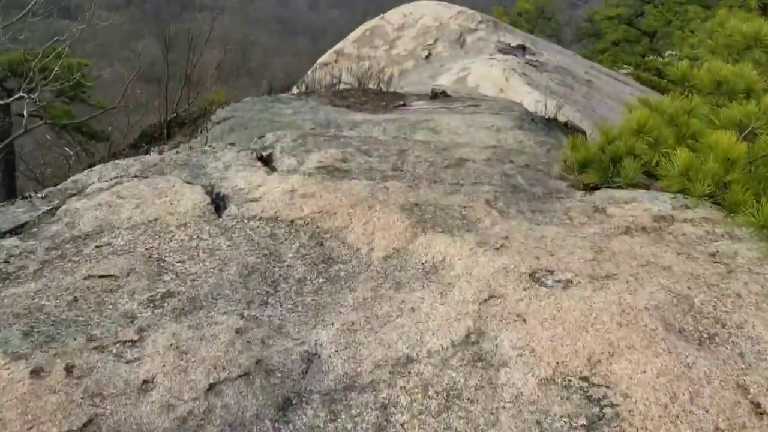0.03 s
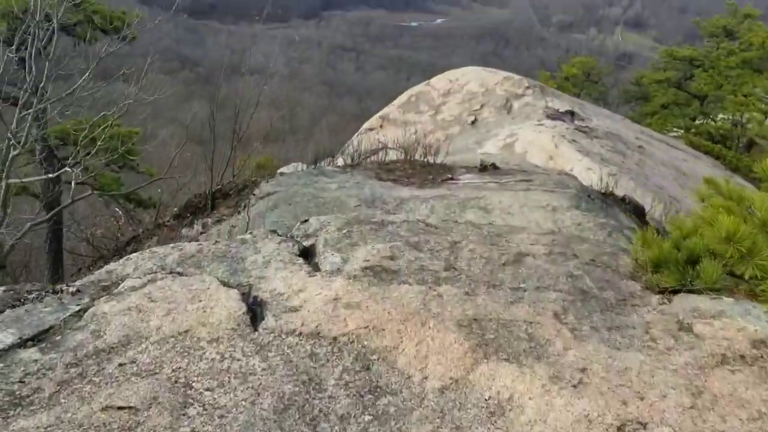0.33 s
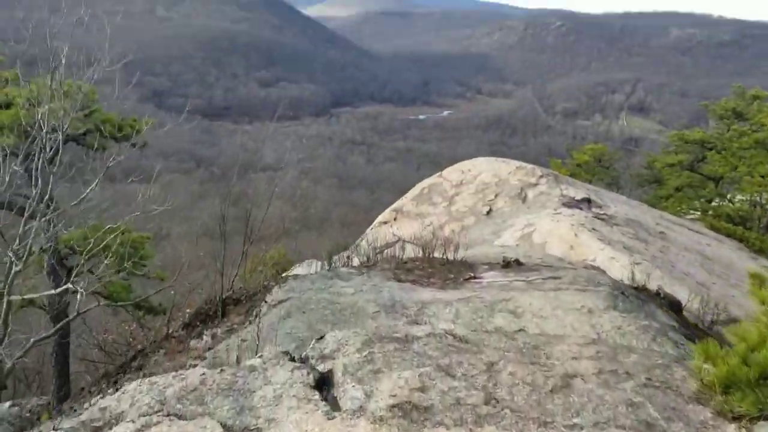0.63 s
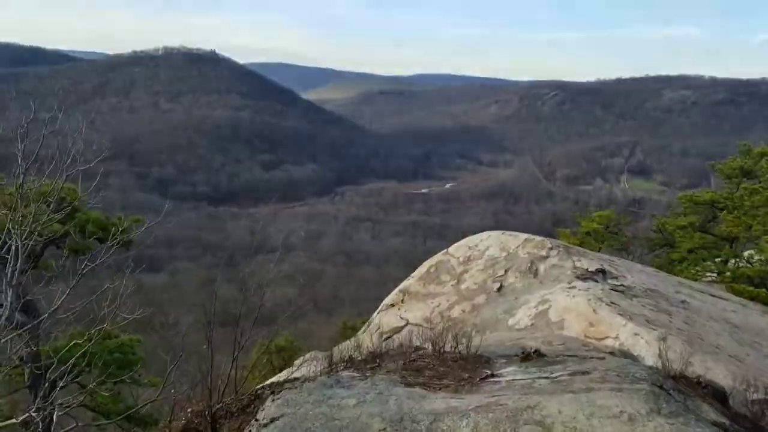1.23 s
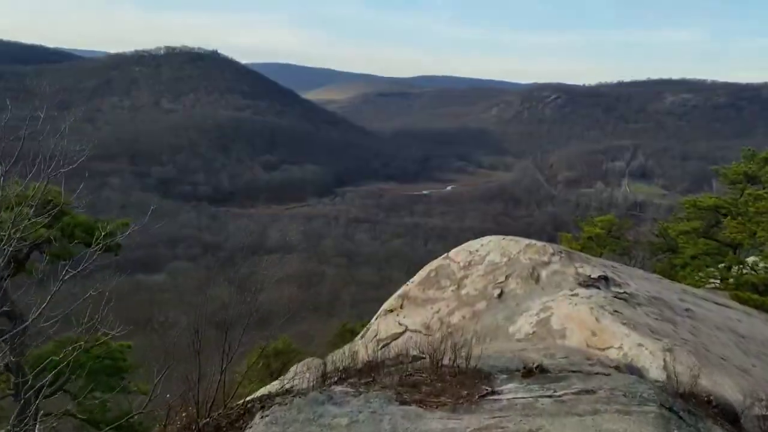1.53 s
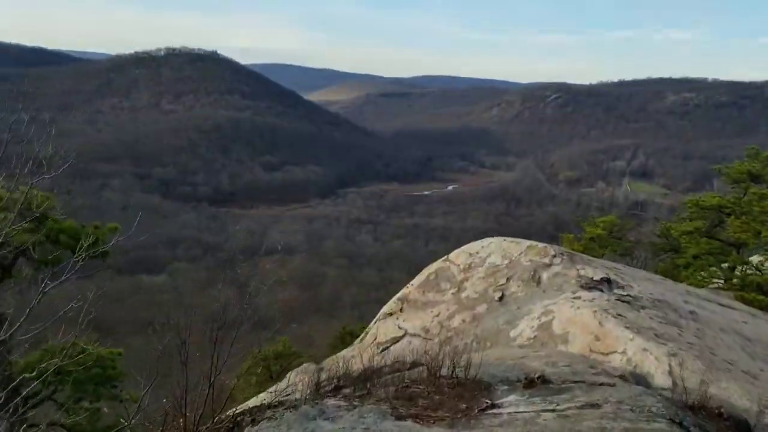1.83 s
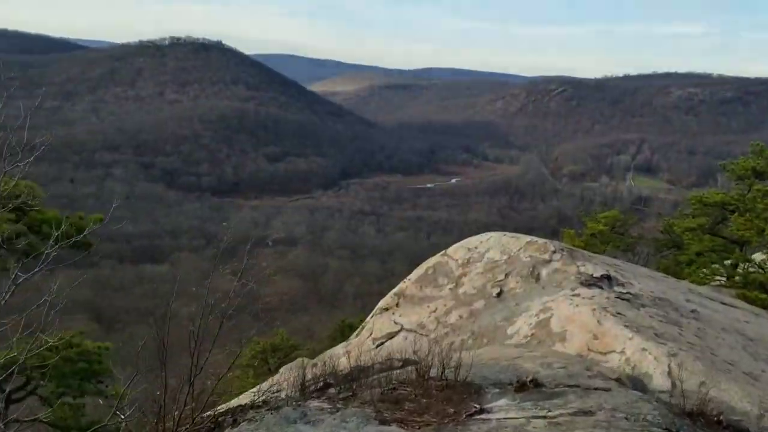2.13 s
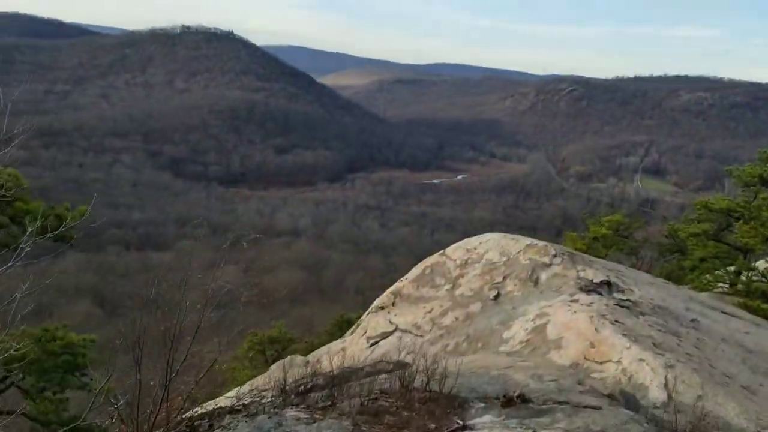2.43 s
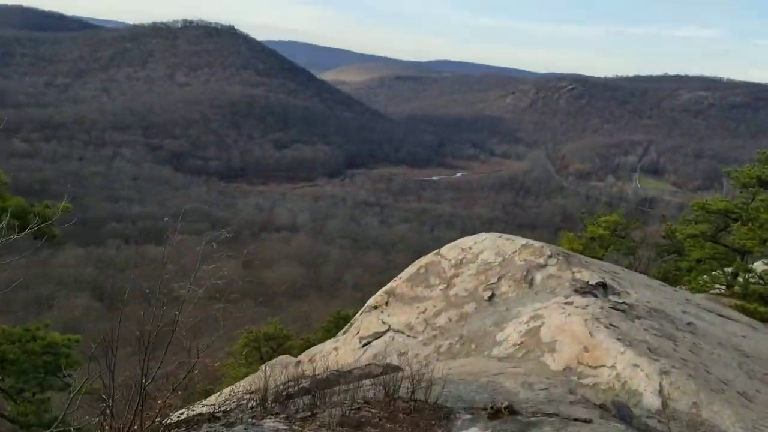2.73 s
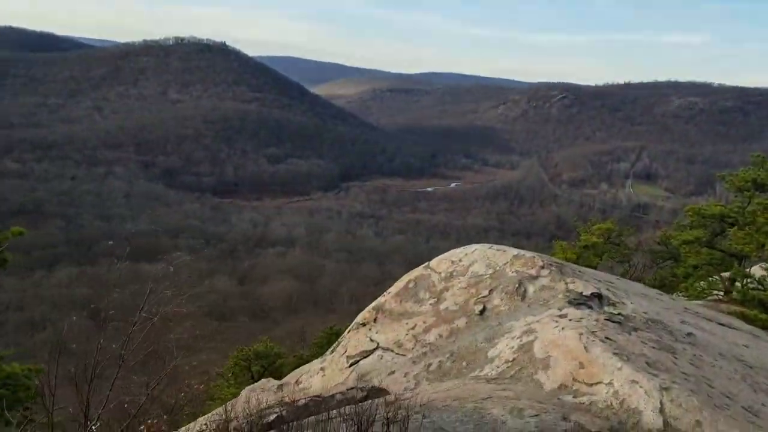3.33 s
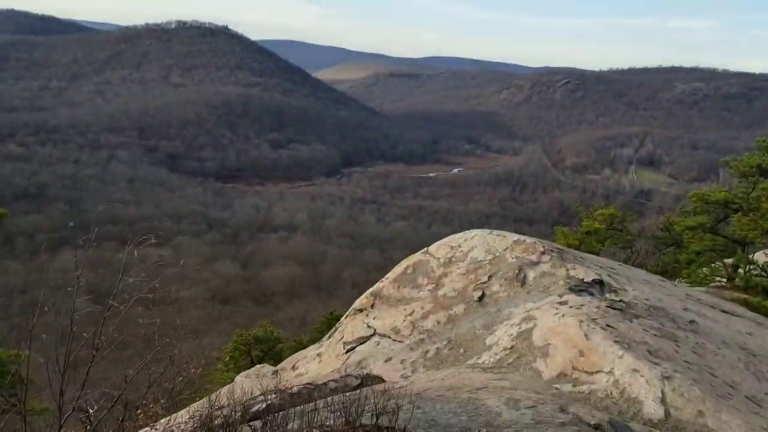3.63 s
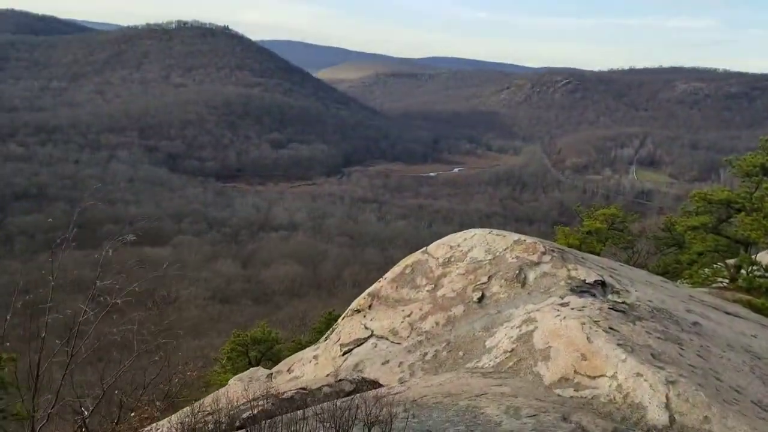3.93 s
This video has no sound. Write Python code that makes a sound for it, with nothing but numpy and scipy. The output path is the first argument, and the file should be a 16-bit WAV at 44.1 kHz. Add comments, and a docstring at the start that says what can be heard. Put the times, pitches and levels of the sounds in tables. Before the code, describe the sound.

A few light footsteps scuff and pat on bare rock outdoors, with rustling clothes and clinking loose stones. Something hard clacks once early on, then gusts buffet the hand-held microphone, strongest near the end, over a faint hiss.

```python
"""A bare rock summit, with no walls to echo. Someone shifts a few steps: clothing rustles, soles
scuff and pat, grit ticks, loose stones clink, and something hard clacks once on the stone.
Gusts buffet the two ports of a hand-held microphone in turn, over a faint hiss of open air.
Wind and scuffs are shaped noise, contacts are short noise bursts and pressure pulses,
and whatever rings is a set of quickly dying sine modes."""
import sys
import numpy as np
from scipy import signal
from scipy.fft import rfft, irfft
from scipy.io import wavfile
from scipy.ndimage import uniform_filter1d

SR = 44100
rng = np.random.default_rng(int(sys.argv[2]) if len(sys.argv) > 2 else 0)


def materialize(psi):
    """Save the field psi as 16-bit PCM at rate SR to the path in sys.argv[1].

    A 1-D psi becomes a single channel; in a 2-D psi each row is a channel.
    """
    bounded = np.clip(np.atleast_2d(psi).T, -1, 1)
    quanta = np.round(bounded * 32767).astype(np.int16)
    wavfile.write(sys.argv[1], SR, quanta)


N = 176400
T = np.arange(N) / SR
HIT_SAMPLES = 8192
HIT_T = T[:HIT_SAMPLES]


def undb(db):
    """Decibels to gain."""
    return 10 ** (np.asarray(db) / 20)


def unit(x):
    """Scale to rms 1."""
    return x / np.sqrt(np.mean(x ** 2, axis=-1, keepdims=True))


def curve(rows):
    """Join (seconds, value) rows by straight lines."""
    return np.interp(T, *np.array(rows).T)


def pan(db):
    """Left and right gains, db apart; positive leans left."""
    return undb(np.array([[db], [-db]]) / 2)


def shape(colour, size, tilt=0):
    """Gain per frequency bin for a colour, tilted in dB per octave."""
    hz, db = np.array(colour, float).T
    octave = np.log2(np.maximum(np.fft.rfftfreq(size, 1 / SR), 1))
    tilt_db = tilt * np.log2(np.clip(2 ** octave, hz[0], hz[-1]))
    return undb(np.interp(octave, np.log2(hz), db) + tilt_db)


def noise(colour, tilt=0):
    """Coloured noise, unrelated left and right."""
    white = rng.standard_normal((2, N))
    return unit(irfft(rfft(white) * shape(colour, N, tilt), N))


def wander(hz):
    """Smooth random drift, spread near 1."""
    hold = int(SR / hz)
    return 1.26 * uniform_filter1d(rng.standard_normal(N)[np.arange(N) // hold], hold)


def pulse(centre_s, hz, t=HIT_T, width_cycles=.5):
    """A brief swing of pressure: a cosine under a bell curve."""
    cycles = (t - centre_s) * hz
    return np.cos(2 * np.pi * cycles) * np.exp(-(cycles / width_cycles) ** 2)


def burst(colour, decay_s, tilt=0, grain_db=0, taps=512, grain_samples=32, unrelated=.3):
    """A dying spray of tiny contacts; the unrelated share of its power differs between the ports."""
    cepstrum = irfft(np.log(shape(colour, taps, tilt)))[:taps // 2]
    cepstrum[1:] *= 2  # minimum phase keeps the attack sharp
    response = irfft(np.exp(rfft(cepstrum, taps)))
    white = rng.standard_normal((3, HIT_SAMPLES))
    stereo = np.sqrt(1 - unrelated) * white[0] + np.sqrt(unrelated) * white[1:]
    grains = undb(grain_db * np.repeat(rng.standard_normal(HIT_SAMPLES // grain_samples), grain_samples))
    fade = np.exp(-HIT_T / decay_s)
    spray = signal.fftconvolve(stereo * fade * grains, response[None], axes=1)[:, :HIT_SAMPLES]
    return unit(spray) * np.sqrt(np.mean(fade ** 2))


def ring(modes, focus=0, pitch=1, focus_hz=2270):
    """Dying modes of a struck object, turned down by focus dB per octave away from focus_hz."""
    hz, db, t60 = np.array(modes).T[:, :, None]
    gains = undb(db - focus * np.abs(np.log2(hz / focus_hz)))
    phase = .5 * rng.standard_normal((2, len(hz), 1))  # a little different at each port
    fade = np.exp(-np.log(1000) * HIT_T / t60)
    return (gains * np.sin(2 * np.pi * pitch * hz * HIT_T + phase) * fade).sum(1)


def add(out, start_s, sound, lag_s=.00045):
    """Mix in a sound from the ground; it reaches the left port lag_s late."""
    for port, lag in enumerate((lag_s, 0)):
        first = int((start_s + lag) * SR)
        part = sound[port, :N - first]
        out[port, first:first + len(part)] += part


# Gust strength at each microphone port. Each row: time in seconds, level in dB.
GUSTS_LEFT = [(0.0, -63), (0.249, -60.5), (0.788, -64.5), (1.177, -52.5), (1.267, -35.5), (1.427, -45),
              (1.816, -54), (1.846, -38), (2.175, -58.5), (2.355, -37), (2.424, -52), (2.734, -58),
              (2.844, -37), (2.923, -51), (3.103, -40.5), (3.143, -18.5), (3.193, -28), (3.223, -20),
              (3.263, -23.5), (3.332, -19), (3.592, -38), (3.662, -40), (3.702, -46), (3.991, -57)]
GUSTS_RIGHT = [(0.0, -64), (0.22, -61.5), (0.619, -66), (0.928, -56), (1.177, -59), (1.277, -37),
               (1.646, -46), (1.676, -30), (1.726, -39.5), (1.756, -28.5), (1.786, -45.5), (1.856, -29.5),
               (1.876, -43.5), (1.976, -39), (2.005, -29.5), (2.095, -25.5), (2.125, -48), (2.504, -39.5),
               (2.584, -55.5), (2.704, -45), (2.804, -55.5), (3.043, -47.5), (3.063, -36.5), (3.133, -55.5),
               (3.263, -43), (3.582, -50), (3.801, -47), (3.991, -64.5)]
# Deep rumble, boomy buffeting and brighter eddies. Each row: frequency in Hz, relative level in dB.
RUMBLE_COLOUR = [(15, -31), (40, 3), (70, 4), (110, -1), (200, -23.5), (600, -80)]
BUFFET_COLOUR = [(20, -24.5), (45, -15.5), (80, 0.5), (120, 3.5), (180, -5.5), (260, -13), (400, -33.5),
                 (700, -39), (2000, -94)]
EDDY_COLOUR = [(60, -23), (180, 1), (300, 7), (600, -13), (900, -26.5), (1600, -36.5), (5000, -51.5)]


def wind(rumble_ceiling_db=-37, strong_gust_db=-17, eddy_growth=1.9, even_s=.0329):
    """Each port rumbles with its own gusts; strong ones shed brighter eddies."""
    def even(x):
        """Flatten the noise's own swells, so the gusts set its level."""
        return x / np.sqrt(uniform_filter1d(x ** 2, int(even_s * SR), axis=1) + 1e-9)

    gust_db = np.array([curve(GUSTS_LEFT), curve(GUSTS_RIGHT)])
    rumble = noise(RUMBLE_COLOUR) * undb(np.minimum(gust_db, rumble_ceiling_db))
    buffet = even(noise(BUFFET_COLOUR)) * undb(gust_db + 1)
    eddies = even(noise(EDDY_COLOUR)) * undb(-23.5 + eddy_growth * (gust_db - strong_gust_db))
    return rumble + buffet + eddies


# Tone of the airy bed, hiss and breeze. Each row: frequency in Hz, relative level in dB.
HISS_COLOUR = [(30, -7), (100, -39), (200, 1.5), (260, 5), (380, -8.5), (650, -8), (1000, -17), (1600, -24),
               (3000, -26), (5500, -24.5), (8500, -22.5), (12000, -25), (15500, -32.5)]
BREEZE_COLOUR = [(150, -3), (300, -3.5), (650, -4), (1100, -10.5), (2000, -24), (4000, -31), (9000, -27.5),
                 (15000, -36)]
# Their fader rides. Each row: time in seconds, level in dB.
HISS_LEVEL = [(0, -55.5), (.3, -59), (.65, -56), (.85, -58.5), (1.05, -56.5), (1.2, -62.5), (1.8, -56.5),
              (2.5, -59.5), (3.08, -60.5), (3.72, -58.5), (3.86, -55), (4, -59.5)]
BREEZE_LEVEL = [(0, -76), (.7, -67.5), (.95, -60.5), (1.3, -58), (1.8, -59), (2.25, -57.5), (2.6, -57),
                (2.85, -56.5), (3.1, -60.5), (3.7, -60.5), (4, -69)]


def open_air():
    """A faint wavering hiss, and a breeze that picks up over the summit."""
    hiss = noise(HISS_COLOUR) * undb(curve(HISS_LEVEL) + .4 * wander(hz=7.04)) * pan(1.5)
    breeze = noise(BREEZE_COLOUR) * undb(curve(BREEZE_LEVEL) + .62 * wander(hz=38.7)) * pan(6.5)
    return hiss + breeze


# Low thumps on the microphone. Each row: time in seconds, peak level in dB, pitch in Hz, pan in dB.
THUMPS = [(0.149, -45, 91, -6), (0.837, -46, 58.3, -8), (1.278, -26, 104, 10), (1.346, -26, 129, -8.5),
          (1.669, -30.5, 166, -21.5), (1.761, -31.5, 146, -18), (2.007, -31.5, 181, -25.5),
          (2.017, -27, 204, -23.5), (2.032, -36, 188, -3), (2.075, -24, 222, -24.5), (2.085, -29, 194, -30),
          (3.154, -27, 345, 27.5), (3.226, -26.5, 157, 32.5), (3.239, -38.5, 475, 22), (3.264, -34, 726, 7),
          (3.311, -31, 398, 28), (3.329, -31.5, 580, 27), (3.364, -30, 390, 27), (3.392, -37.5, 397, 18),
          (3.557, -33, 192, 26)]


def microphone_thumps():
    """Wind and handling thump the microphone; the strongest gust flutters briefly on the left."""
    thumps = sum(undb(db) * pan(pan_db) * pulse(at, hz, T) for at, db, hz, pan_db in THUMPS)
    flutter = undb(-27.5) * pan(35) * pulse(centre_s=3.331, hz=178.3, t=T, width_cycles=3.2)
    return thumps + flutter


# The sandy tone of scuffs, rustles and grit. Each row: frequency in Hz, relative level in dB.
GRAINY_COLOUR = [(300, -5.5), (1000, 1.5), (1600, 1), (2150, -0.5), (2480, -5.5), (2900, -3), (3600, -1),
                 (4900, -2.5), (6400, -7), (9000, -7), (12000, -14.5), (15500, -23.5)]
# Soft rasps and rustles of soles and clothing. Each row: peak time in seconds, level in dB,
# rise and decay in seconds, brightness in dB per octave.
RASPS = [(.17, -66.5, 0.045, 0.049, 9), (.56, -60.5, 0.08, 0.089, 1.5), (.98, -57, .03, 0.11, -1),
         (1.28, -65.5, 0.051, 0.092, 4), (1.6, -57.5, 0.042, 0.074, -1.5), (2.04, -60, 0.05, 0.18, -0.5),
         (2.27, -59.5, 0.16, 0.23, -3.5), (2.8, -62, 0.071, 0.14, -1), (3.198, -55.5, 0.025, 0.14, -1),
         (3.56, -63.5, 0.068, 0.067, 0), (3.85, -62.5, 0.083, 0.13, -1.5)]


def scuffs_and_rustles():
    """Soles and clothing rub in soft, grainy rasps that swell and fade."""
    out = np.zeros((2, N))
    grains = undb(wander(hz=1200))
    for peak, db, rise, decay, tilt in RASPS:
        swell = np.exp(-np.maximum((peak - T) / rise, (T - peak) / decay))
        out += undb(db) * swell * grains * noise(GRAINY_COLOUR, tilt)
    return out * pan(7.5)


# The muffled tone of a sole on rock. Each row: frequency in Hz, relative level in dB.
PAT_COLOUR = [(80, -8), (250, 0), (450, 0), (750, -5), (1100, -11), (1700, -17), (2500, -30), (5000, -48),
              (15000, -65)]
# Footfalls. Each row: start in seconds, level in dB, decay in seconds, pan in dB,
# brightness in dB per octave.
PATS = [(.470, -45, .004, 1, -2), (.511, -52, .003, 1, 1), (1.5325, -33.5, .0045, 1, -1),
        (2.053, -35, .003, -6, -1), (3.790, -37.5, .005, 1, -2.5)]


def pats():
    """A sole lands on the rock: a soft burst with a dull thud under it."""
    out = np.zeros((2, N))
    thud = undb(2) * pulse(centre_s=.003, hz=340)
    for start, db, decay, pan_db, tilt in PATS:
        add(out, start, undb(db) * pan(pan_db) * (burst(PAT_COLOUR, decay, tilt) + thud), lag_s=0)
    return out


# Small, dry crunches. Each row: start in seconds, level in dB, decay in seconds,
# brightness in dB per octave, pan in dB.
GRIT_TICKS = [(0.4818, -45.5, 0.0015, 4.5, 2), (0.548, -43, 0.0012, -4, -11), (0.57, -54, 0.0055, 2, -6),
              (.988, -52, 0.0066, 10, 0), (.999, -42.5, 0.0062, -5.5, -1), (1.564, -46, .002, -4, 14),
              (1.608, -43.5, 0.0055, -9.5, 7), (1.808, -52.5, 0.0026, -2.5, -2),
              (2.014, -43.5, 0.0059, -0.5, 5.5), (2.027, -43, 0.0096, -9, 7), (2.2391, -51, .003, -3.5, 17),
              (2.288, -51.5, 0.0036, 1, 0), (2.767, -51, 0.0064, -7, 15.5), (3.15, -51, .0055, -1.5, 2),
              (3.159, -49, 0.028, -2.5, 11.5), (3.182, -35.5, 0.012, -3.5, 4.5),
              (3.201, -49, 0.006, -1, -4), (3.493, -50, 0.015, -2.5, 8.5), (3.515, -52.5, 0.0082, -5, 9),
              (3.569, -51.5, 0.013, -4, 6.5), (3.59, -54.5, 0.0073, -2, 12), (3.893, -51.5, .004, -5, 10)]


def grit():
    """Grit crushed under the sole ticks in short, uneven sprays."""
    out = np.zeros((2, N))
    for start, db, decay, tilt, pan_db in GRIT_TICKS:
        add(out, start, undb(db) * pan(pan_db) * burst(GRAINY_COLOUR, decay, tilt, grain_db=4))
    return out


# A loose stone's ring. Each row: base frequency in Hz, relative level in dB, seconds to fall 60 dB.
STONE_MODES = [(2100, -7.5, 0.019), (2435, 2.5, 0.019), (2545, -9.5, 0.044), (3060, -8, .022),
               (3880, -33, 0.03), (4900, -17, .025), (6260, -11, 0.036), (8900, -35, .025)]
# Stones nudged underfoot. Each row: start in seconds, level in dB, pan in dB, pitch ratio.
CLINKS = [(0.5458, -45, 3, 0.93), (.9745, -47, 2, 0.93), (.985, -48, 2, 1.2), (.999, -42.5, 2, 0.94),
          (2.016, -48.5, 2, 0.7), (2.030, -50.5, 7, .85), (3.185, -34, 3, 1.04), (3.206, -41.5, 0, 1.1),
          (3.495, -50.5, 8, 1.02), (3.570, -47.5, 11, 1.29)]


def clinks():
    """Loose stones ring briefly against the rock, each at its own pitch."""
    out = np.zeros((2, N))
    for start, db, pan_db, pitch in CLINKS:
        add(out, start, undb(db) * pan(pan_db) * ring(STONE_MODES, pitch=pitch))
    return out


# The clack's sharp attack and crunchy tail. Each row: frequency in Hz, relative level in dB.
CRACK_COLOUR = [(100, -23), (300, -19), (700, -1), (1200, -7), (1900, -0.5), (3200, 0.5), (4300, -3),
                (6500, -2), (9500, -14.5), (12000, -31), (15500, -38)]
CRUNCH_COLOUR = [(150, -11), (750, -1), (1200, 1), (1700, -9.5), (2500, -0.5), (3500, -11.5), (6000, -13),
                 (9000, -13), (12000, -16), (15500, -22)]
# The hard object's ring. Each row: frequency in Hz, relative level in dB, seconds to fall 60 dB.
CLACK_MODES = [(690, -2, .019), (2310, -7.5, .032), (2700, -7, .036), (2850, -11, .035), (3930, 0, .021),
               (4270, -13, .018), (4900, -15, .018), (5560, -18, .018), (7010, -15, .022),
               (8850, -18, .028)]
# The blow and its rebound. Each row: start in seconds, crack level in dB, ring level in dB,
# ring focus in dB per octave.
BLOWS = [(.9189, -15, -18, 0), (.9276, -29, -23, 14)]


def clack():
    """Something hard hits the stone with a crack, a knock and a short ring; a crunch trails the blow."""
    out = np.zeros((2, N))
    knock = undb(-8) * pulse(centre_s=.00072, hz=930)
    for start, crack_db, ring_db, focus in BLOWS:
        attack = undb(crack_db) * (burst(CRACK_COLOUR, decay_s=.0013) + knock)
        add(out, start, attack + undb(ring_db) * ring(CLACK_MODES, focus))
    add(out, BLOWS[0][0], undb(-30) * burst(CRUNCH_COLOUR, decay_s=.014))
    return out


def scene():
    """Wind and feet in the open, all dry."""
    bed = wind() + open_air() + microphone_thumps()
    return bed + scuffs_and_rustles() + pats() + grit() + clinks() + clack()


def record(dry):
    """The microphone rounds the hardest gusts; the recorder cuts the top."""
    ceiling, top_hz = .6, 15900
    rounded = ceiling * np.tanh(dry / ceiling)
    return signal.sosfilt(signal.ellip(10, .2, 80, top_hz, fs=SR, output="sos"), rounded)


dry = scene()
out = record(dry)
materialize(out)
```